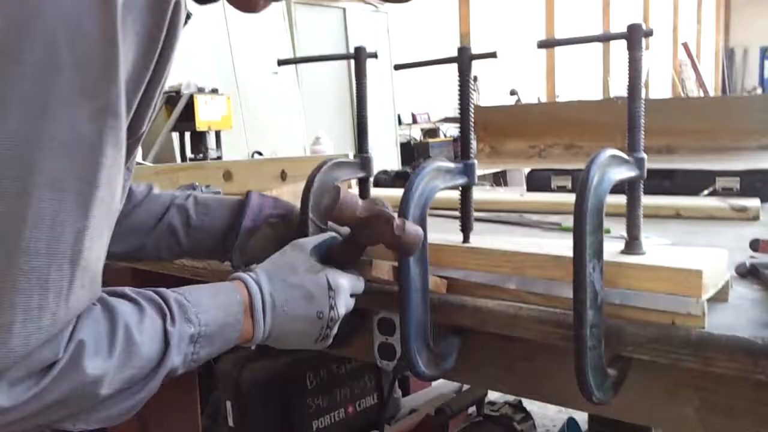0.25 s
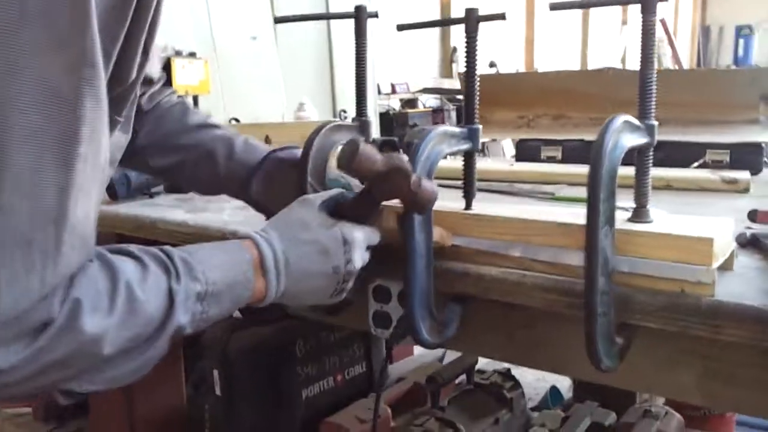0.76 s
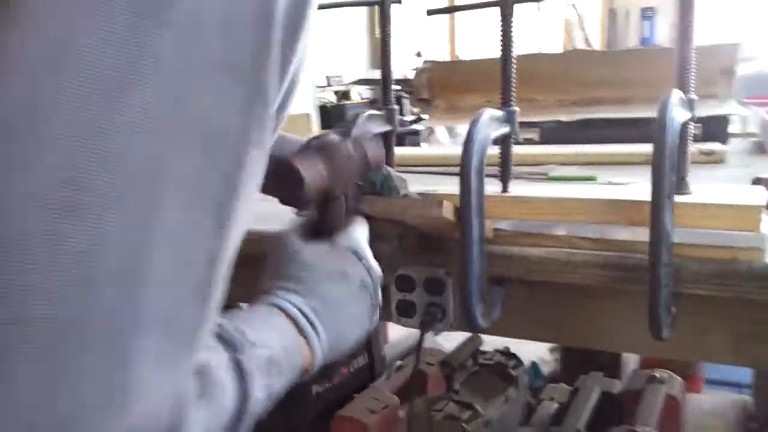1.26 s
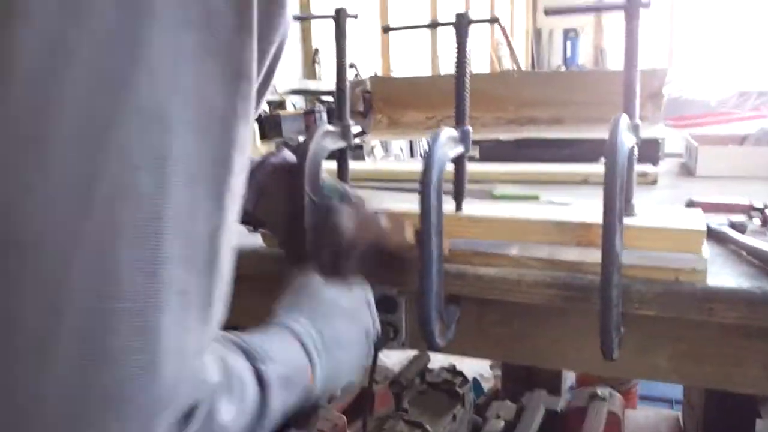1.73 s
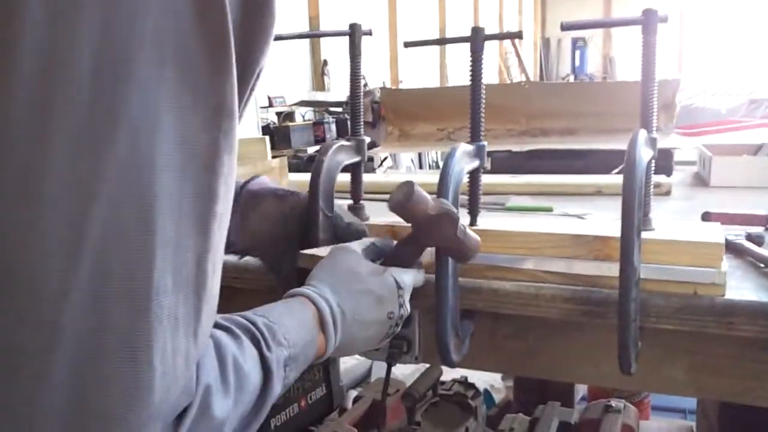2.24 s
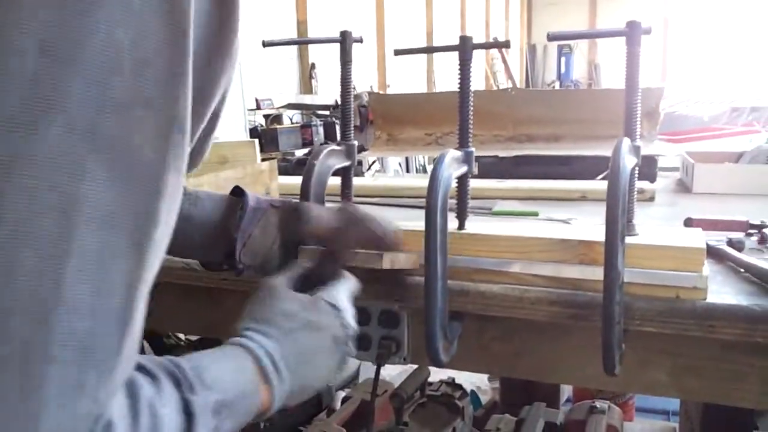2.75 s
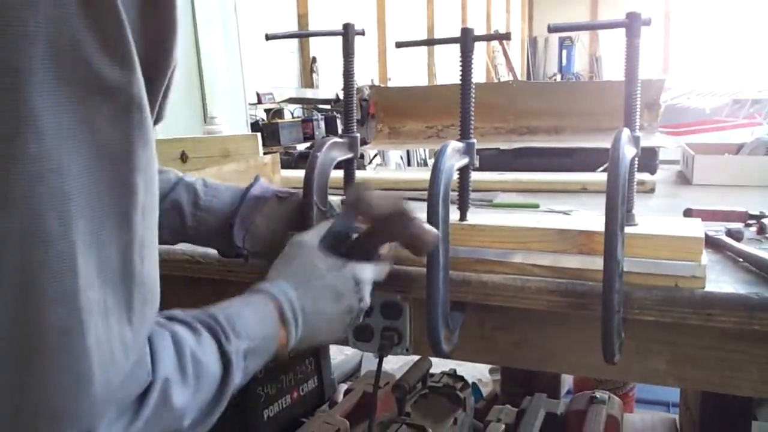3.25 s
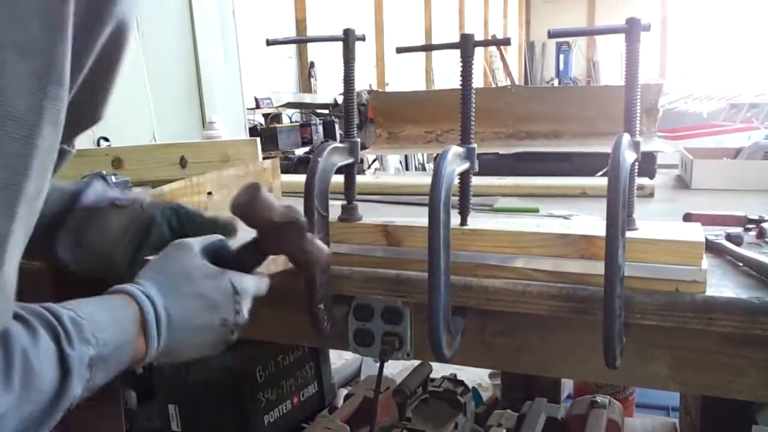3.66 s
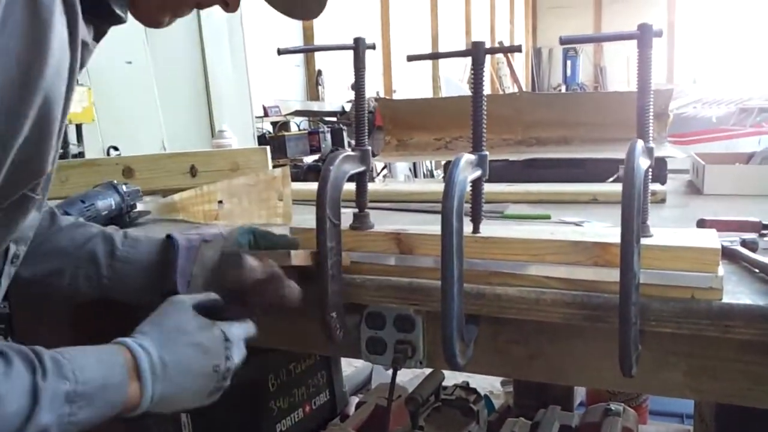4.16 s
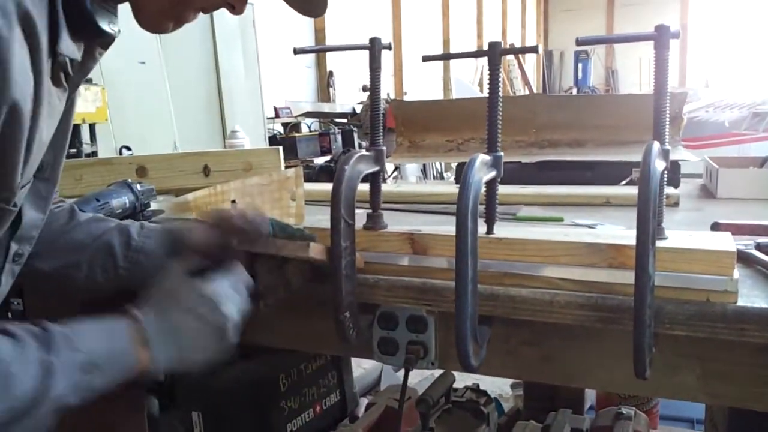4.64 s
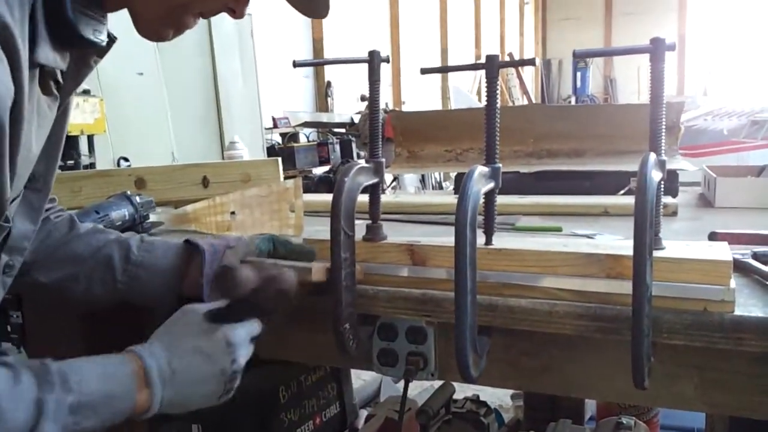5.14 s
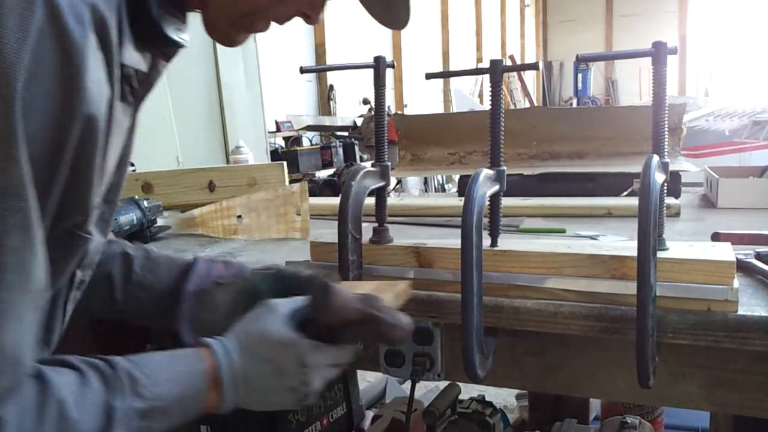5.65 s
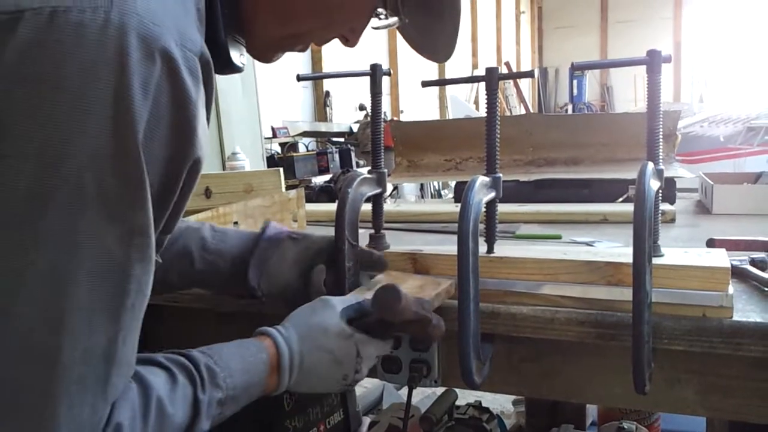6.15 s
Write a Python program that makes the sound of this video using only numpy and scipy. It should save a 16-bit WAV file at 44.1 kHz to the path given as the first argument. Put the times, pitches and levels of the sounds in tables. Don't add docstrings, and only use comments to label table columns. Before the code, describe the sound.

In a large hard-walled workshop, a hammer strikes wood against clamped aluminium, blows distorting and rattling, between gloved rubbing, ticks and soft taps.

```python
import sys
import numpy as np
from scipy import signal
from scipy.fft import rfft, irfft
from scipy.io import wavfile
from scipy.ndimage import uniform_filter1d

SR = 44100
rng = np.random.default_rng(int(sys.argv[2]) if len(sys.argv) > 2 else 0)


def put_to_file(sound):
    columns = np.atleast_2d(sound).T
    safe = np.clip(columns, -1, 1)
    whole_steps = np.round(safe * 32767)
    wavfile.write(sys.argv[1], SR, whole_steps.astype(np.int16))


def natural_amplitude(level_db):
    exponent = np.asarray(level_db, float) / 20
    return 10 ** exponent


N = 282232
TIME = np.arange(SR // 3) / SR

# pitch_hz, level_db [dB per Hz]
AIR_COLOUR = [(20, -37), (70, -0.5), (190, -4.5), (540, -7.5), (2800, -21.5), (4700, -14.5), (14300, -22),
              (14900, -53)]
AIR_DB = -57.5
# pitch_hz, level_db [dB rms]
HUM = [(97, -72), (193.8, -65), (289, -71)]
# pitch_hz, t60_s
HALL_T60 = [(60, 0.33), (160, 1.2), (420, 1.27), (1100, 1.42), (2900, 1.004), (5500, 0.73), (9000, 0.67),
            (14000, 0.25)]

# start_s, peak_db, pitch_hz, t60_s
THUDS = [(0.36, -47, 530, 0.17), (4.11, -46, 62, .22), (4.068, -40, 190, .35), (5.001, -26, 170, .4),
         (6.0, -45, 230, 0.15), (2.53, -44, 400, .12), (.727, -43, 320, .25), (2.205, -33, 420, .15)]
# start_s, pitch_hz, level_db, t60_s
PINGS = [(2.204, 1012, -26, 0.29), (2.206, 2152, -41, 1.5), (2.206, 1995, -41, .9), (3.932, 590, -43, 0.3),
         (5.981, 597, -38, .25), (5.981, 748, -39, .1), (.893, 2550, -56, .08), (.885, 3800, -57, .1),
         (.925, 3780, -50, .08), (5.541, 590, -30, 0.12)]

# start_s, hold_s, level_db, treble_db [relative to the stroke]
RUBS = [(0.263, 0.052, -43, -53), (0.418, 0.056, -42, -24), (0.494, 0.071, -32, -35), (0.59, 0.09, -51, 6),
        (0.705, 0.13, -54.5, -4), (0.883, 0.065, -46.5, -11), (1.05, 0.43, -60.5, -4),
        (1.584, 0.048, -39, -11.5), (3.267, .045, -29, -14.5), (3.495, 0.13, -58, 2.5),
        (3.731, 0.038, -39, -16.5), (3.83, .12, -51.5, -5.5), (4.057, 0.059, -48.5, -6.5),
        (4.165, 0.053, -46, -10.5), (4.256, 0.017, -47, -25.5), (4.357, 0.034, -53.5, -7.5),
        (5.44, 0.035, -39, -26.5), (5.63, 0.064, -49, -1.5), (5.786, .03, -54, -14.5),
        (5.92, .03, -48.5, -10.5), (5.99, 0.022, -44.5, -7), (6.076, 0.096, -48.5, -9)]
# pitch_hz, width_hz, level_db
LOOSE_SHEET = [(2546, 290, 2.5), (3740, 390, -3.5), (5400, 1400, -2)]
RUB_ATTACK_S, RUB_RELEASE_T60_S = 0.013, 0.11

# start_s, peak_db, centre_hz
TICKS = [(0.3348, -35, 4400), (0.437, -30.5, 3840), (0.4594, -38, 6840), (0.4943, -21, 3587),
         (0.5183, -26.5, 4480), (0.5497, -21.5, 5750), (0.5891, -24, 4350), (0.6014, -32.5, 3940),
         (0.7191, -38, 2054), (0.8831, -39.5, 3816), (0.9271, -33, 3650), (1.2399, -45.5, 1797),
         (1.2696, -38.5, 9200), (2.5278, -28, 3420), (2.5501, -28.5, 3470), (3.7314, -31, 3050),
         (3.7494, -30, 3340), (3.7714, -37, 3490), (3.934, -38, 3470), (4.0564, -23.5, 3530),
         (4.1003, -41, 3250), (4.1294, -43.5, 2130), (4.1669, -38.5, 5230), (4.2596, -30, 4300),
         (4.5894, -48.5, 5430), (5.984, -37, 6460), (2.203, -31.5, 9960), (2.5285, -26, 7000),
         (5.541, -33.5, 9900)]
# start_s, peak_db, centre_hz
KNOCKS = [(.3348, -47, 1050), (.4943, -43, 504), (.5183, -47, 890), (.6, -37.5, 1246), (.7191, -37, 600),
          (2.5278, -41.5, 627), (2.5501, -43, 533), (3.7314, -42, 305), (3.7494, -44, 825),
          (3.934, -38, 610), (4.0564, -37.5, 759), (4.1003, -37.5, 325), (4.1294, -38.5, 697),
          (4.2596, -42.5, 320), (5.984, -34, 645), (4.168, -42, 1722), (4.263, -42.5, 1408)]
TICK_T60_S, KNOCK_T60_S = 0.043, 0.14

# start_s, peak_db, hall_db, hammer_ring_db, brightness [dB per octave]
BLOWS = [
    (.0005, -24.5, -12, -62, -0.5),
    (1.3165, 4.5, -26.5, -47, -1),
    (1.728, 9.5, -17.5, -46, 0.7),
    (2.202, -16, -18.5, -51.5, -2),
    (2.9067, 6.5, -22.5, -28.5, -1),
    (3.2781, -13.5, -21, -68, -1.5),
    (4.662, 13, -24, -39.5, 0.97),
    (4.984, 8, -15.5, -21.5, 0.25),
    (5.5384, -14, -22.5, -68, -2),
]
# pitch_hz, width_hz, level_db
SPOTS = [
    [(569, 60, 5), (1340, 82, 5), (2124, 57, 5.5)],
    [(792, 300, 6), (3400, 330, 3), (2300, 180, -3.5)],
    [(1310, 230, -1), (2833, 150, 4.5), (2093, 110, 1), (5490, 300, -2.5)],
    [(670, 350, -0.5), (2180, 45, 3), (2080, 93, 17), (3100, 300, 3)],
    [(1268, 120, 7.5), (2010, 200, -3), (2630, 150, 2.5), (3550, 600, -1)],
    [(600, 270, 6.5), (1240, 160, 6.5), (2090, 82, -6)],
    [(766, 78, 4.5), (2530, 260, 3.5), (1687, 99, 3.5), (574, 60, -0.2), (327, 35, 1.5)],
    [(793, 66, -3.5), (1840, 200, 2.5), (2670, 350, -5.5), (299.6, 43, -2.5)],
    [(580, 125, 4.5), (810, 55, 12), (1150, 130, 9.5), (2420, 300, 0)],
]
# start_s, peak_db, tilt [dB per octave]
REBOUNDS = [(1.757, 1.5, -0.4), (2.923, -4.5, -0.5), (2.932, -4, -2.5), (2.933, -6.5, 4), (2.958, -2, -1.5),
            (4.69, -1.5, 1.5), (4.698, 0.5, -1), (4.705, -3, -3), (5.009, 8.5, 0.5), (5.025, 2.5, -2),
            (5.04, -1.5, 0)]
# pitch_hz, level_db, t60_s
HAMMER = [(5970, -4, .2), (6005, -5, .28), (9960, -7, .22), (11260, -6, .25), (11420, -6, .25),
          (11473, -2, .33), (11541, -8, .28), (11640, -7, .2)]
# pitch_hz, level_db [dB per Hz]
BLOW_COLOUR = [(35, -47), (60, -13.5), (230, -17), (480, -14), (800, -6.5), (2100, -4.5), (5500, -7.5),
               (12000, -12.5)]
# pitch_hz, width_hz, level_db
BENCH = [(3630, 140, -5.5), (4960, 270, -9.5), (5600, 130, -5)]
CHATTER_T60_S, REBOUND_T60_S = 0.16, 0.082
CONTACT_S, CONTACT_S_PER_DB = 0.0135, -0.0002
TOP_BLOW_HZ, TOP_OCTAVES_PER_DB = 13800, 0.3976
NOTE_DB, NOTE_T60_S = -17, 0.1
CHOKE_DB, CHOKE_PER_HALL_DB = 11.5, 1.0

# start_s, side_db [under the mid]
SPLITS = [(1.757, -16), (3.738, -14), (4.682, -17.5), (5.011, -15)]
# pitch_hz, level_db [side minus mid]
SIDE_COLOUR = [(60, -27), (110, -30.5), (200, -24.5), (700, -30), (2380, -34), (4400, -28.5), (8120, -30),
               (15000, -26.5)]
BASS_CUT_HZ = 41
TOP_HZ, TOP_DB = 14700, -8.0
MASK_HZ, MASK_DB, MASK_DB_PER_KHZ = 10100, -42, 3.2


def on_log(points, hz):
    table = np.array(points)
    return np.interp(np.log(hz), np.log(table[:, 0]), table[:, 1])


def fade(t, t60):
    return np.exp(-np.log(1000) * t / max(t60, 1e-3))


def colour(x, db_of_hz):
    size = 8192
    db = db_of_hz(np.maximum(np.arange(size // 2 + 1) * SR / size, 1))
    ceps = irfft(np.maximum(db, np.max(db) - 70) * np.log(10) / 20)
    ceps[1:size // 2] *= 2
    ceps[size // 2 + 1:] = 0
    response = irfft(np.exp(rfft(ceps)))[:size // 2]
    return signal.fftconvolve(x, response)[:len(x)]


def bump(hz, centre_hz, width_hz):
    return 1 / (1 + ((hz - centre_hz ** 2 / hz) / width_hz) ** 2)


def level(x, db):
    return x * natural_amplitude(db) / np.sqrt(np.mean(x ** 2))


def to_peak(x, db):
    return x * natural_amplitude(db) / np.abs(x).max()


def add(out, s, x):
    i = max(int(s * SR), 0)
    out[i:i + len(x)] += x[:N - i]


def chatter(t60, click=2.4, treble_share=0.39, rise_s=0):
    x = rng.standard_normal(len(TIME))
    dull = uniform_filter1d(x, size=9)
    x = dull * fade(TIME, t60) + (x - dull) * fade(TIME, treble_share * t60)
    x[0] = click
    return x * np.minimum((TIME + 1 / SR) / (rise_s + 1 / SR), 1)


def air():
    t = np.arange(N) / SR
    waver = np.repeat(rng.standard_normal((len(HUM), N // 3000 + 1)), 3000, axis=1)
    waver = uniform_filter1d(waver, 3000)[:, :N]
    hum = sum(natural_amplitude(db + 2 + 2.5 * w) * np.sin(2 * np.pi * hz * t) for (hz, db), w in zip(HUM, waver))
    hiss = colour(rng.standard_normal(N), lambda hz: on_log(AIR_COLOUR, hz))
    return level(hiss, AIR_DB) + hum


def hall(x):
    t = np.arange(int(1.5 * SR)) / SR
    noise = rfft(rng.standard_normal(len(t)))
    hz = np.arange(len(t) // 2 + 1) / t[-1] + 0.0011
    echo = np.zeros(len(t))
    for centre_hz in 32 * 2 ** (np.arange(19) / 2):
        band = np.cos(np.pi / 2 * np.clip(2 * np.log2(hz / centre_hz), -1, 1)) ** 2
        echo += irfft(noise * band, len(t)) * fade(t, on_log(HALL_T60, centre_hz))
    echo *= 1 - fade(np.maximum(t - 0.004, 0), 0.022)
    return signal.fftconvolve(x, echo / np.sqrt(np.sum(echo ** 2)))[:N]


def thuds():
    out = np.zeros(N)
    for s, db, pitch_hz, t60 in THUDS:
        thud = colour(chatter(t60), lambda hz: 20 * np.log10(bump(hz, pitch_hz, 0.6 * pitch_hz)))
        add(out, s, to_peak(thud, db))
    return out


def pings():
    out, t = np.zeros(N), np.arange(SR) / SR
    for s, hz, db, t60 in PINGS:
        swell = fade(t, t60) * np.cos(np.pi / 2 * t) * np.minimum(t / 0.0013, 1)
        add(out, s, natural_amplitude(db) * swell * np.sin(2 * np.pi * hz * t))
    return out


def rubs():
    def sheet(hz):
        loose = sum(natural_amplitude(2 * d) * bump(hz, f, w) for f, w, d in LOOSE_SHEET)
        return 10 * np.log10(0.98 * bump(hz, 3600, 10000) ** 2 + loose)

    t = np.arange(N) / SR
    roughness = np.repeat(rng.exponential(size=N // 40 + 1), 40)[:N]
    grains = rng.standard_normal((2, N)) * natural_amplitude(1.4 * roughness)
    mid = level(colour(grains[0], sheet), 0)
    treble = level(colour(grains[1], lambda hz: 20 * np.log10(bump(hz, 7300, 9000))), 0)
    out = np.zeros(N)
    for s, hold_s, db, treble_db in RUBS:
        stroke = np.clip((t - s) / RUB_ATTACK_S + 1, 0, 1)
        stroke *= fade(np.maximum(t - s - hold_s, 0), RUB_RELEASE_T60_S)
        out += stroke * natural_amplitude(db - 5.5) * (mid + natural_amplitude(treble_db) * treble)
    return out


def ticks():
    out = np.zeros(N)
    for s, db, centre_hz in TICKS:
        def scratch(hz):
            skirt = 0.1 * bump(hz, centre_hz, centre_hz) ** 2
            return 10 * np.log10(bump(hz, centre_hz, 0.17 * centre_hz) + skirt)
        tick = colour(chatter(TICK_T60_S, 0.8, 0.85, 0.0013), scratch)
        add(out, s - 0.0003, to_peak(tick, db))
    return out


def knocks():
    out = np.zeros(N)
    for s, db, centre_hz in KNOCKS:
        contact = chatter(KNOCK_T60_S, 0.8, 1.0, 0.00097)
        knock = colour(contact, lambda hz: 15 * np.log10(bump(hz, centre_hz, 0.37 * centre_hz)))
        add(out, s - 0.0003, to_peak(knock, db + 2.0))
    return out


def blow_colour(hz, bright_db, spot, tilt_db=0):
    top_hz = TOP_BLOW_HZ * 2 ** (TOP_OCTAVES_PER_DB * bright_db)
    notes = sum(natural_amplitude(2 * d - 7.0) * bump(hz, f, 1.6 * w) ** 2 for f, w, d in BENCH + spot)
    power = natural_amplitude(2 * on_log(BLOW_COLOUR, hz)) + notes
    slope_db = tilt_db * np.log2(hz / 2000) + bright_db * np.log2(np.maximum(hz / 1500, 1))
    return 10 * np.log10(power / (1 + (hz / top_hz) ** 24)) + slope_db


def block_knock(db, hall_db, bright_db, spot):
    def direct(hz):
        late_bass_db = 8 / (1 + (hz / 280) ** 4) + 10 / (1 + (hz / 60) ** 4)
        return blow_colour(hz, bright_db, spot) - late_bass_db

    rattle = to_peak(colour(chatter(CHATTER_T60_S, rise_s=0.0013 * (db < -5)), direct), 0)
    contact_s = CONTACT_S + CONTACT_S_PER_DB * db
    pressed = 1 / (1 + np.exp(np.clip((TIME - contact_s) / 0.0007, -50, 50)))
    left = min(natural_amplitude(CHOKE_DB + CHOKE_PER_HALL_DB * hall_db), 1)
    note_hz, _, note_db = spot[0]
    note = natural_amplitude(NOTE_DB + 2 * note_db) * fade(TIME, NOTE_T60_S) * np.minimum(TIME / 0.00067, 1)
    note *= np.sin(2 * np.pi * note_hz * TIME)
    knock = rattle * (left + (1 - left) * pressed) + note * (0.15 + 0.52 * pressed)
    return to_peak(knock, db + 3.0)


def hammer_ring(db):
    ring = np.zeros(len(TIME))
    for hz, mode_db, t60 in HAMMER:
        ring += natural_amplitude(mode_db) * fade(TIME, t60) * np.sin(2 * np.pi * (hz * TIME + rng.random()))
    return ring * natural_amplitude(db)


def blows():
    near, send = np.zeros(N), np.zeros(N)
    for (s, db, hall_db, ring_db, bright_db), spot in zip(BLOWS, SPOTS):
        knock = block_knock(db, hall_db, bright_db, spot)
        ring = hammer_ring(db + ring_db)
        add(near, s, knock + ring)
        even = colour(1.0 * (TIME == 0), lambda hz: blow_colour(hz, bright_db, spot))
        add(send, s, natural_amplitude(hall_db) * (even * np.std(knock) / np.std(even) + ring))
        for again_s, again_db, tilt_db in REBOUNDS:
            if s < again_s < s + 0.07:
                again = chatter(REBOUND_T60_S, 0.43)
                again = colour(again, lambda hz: blow_colour(hz, bright_db, spot, tilt_db))
                add(near, again_s + 0.0008, to_peak(again, again_db + 0.5))
    return near, send


def scene():
    near, send = blows()
    small = colour(ticks() + knocks() + rubs() + thuds(), lambda hz: -60 * (hz > TOP_HZ))
    echo = natural_amplitude(11.5) * hall(send + natural_amplitude(-22) * small)
    mid = near + small + pings() + echo + air()
    t = np.arange(N) / SR
    parting = sum(natural_amplitude(db) * np.cos(np.pi / 2 * np.clip((t - s) / 0.03, -1, 1)) ** 2 for s, db in SPLITS)
    delayed = np.roll(np.clip(mid, -1, 1), 311)
    side = parting * colour(delayed, lambda hz: on_log(SIDE_COLOUR, hz) + 30.5)
    return np.array([mid + side, mid - side])


def treble_gate(x):
    hz, _, z = signal.stft(x, SR, nperseg=1024)
    power = np.abs(z) ** 2
    band = np.add.reduceat(power, np.arange(0, len(hz), 8), axis=1)
    band = np.repeat(band, 8, axis=1)[:, :len(hz)]
    bar = natural_amplitude(2 * (MASK_DB + MASK_DB_PER_KHZ * (hz - MASK_HZ) / 1000))[:, None]
    kept = (band > bar * power.sum(axis=1, keepdims=True)) | (hz < MASK_HZ)[:, None]
    top = natural_amplitude(TOP_DB * (hz > TOP_HZ))[:, None]
    return signal.istft(z * kept * top, SR, nperseg=1024)[1][:, :N]


def roll_off(x):
    return signal.sosfilt(signal.butter(12, 15650, fs=SR, output="sos"), x)


def record(dry):
    bass_cut = signal.butter(2, BASS_CUT_HZ, "high", fs=SR, output="sos")
    clipped = signal.sosfilt(bass_cut, np.clip(dry, -1, 1))
    mix = np.clip(treble_gate(clipped), -1, 1)
    return roll_off(mix)


dry = scene()
out = record(dry)
put_to_file(out)
```